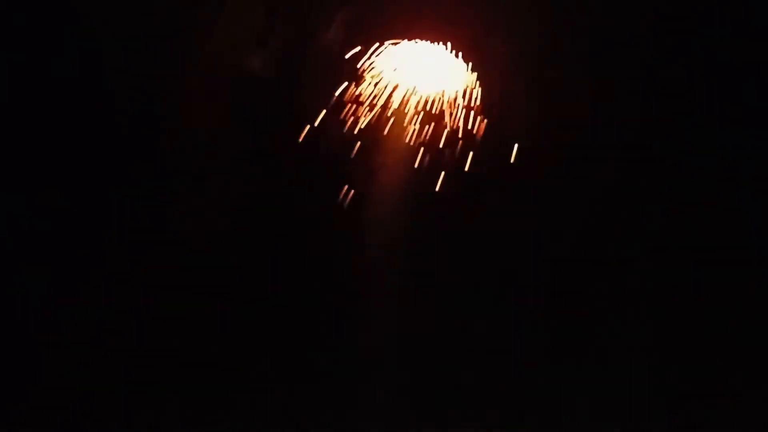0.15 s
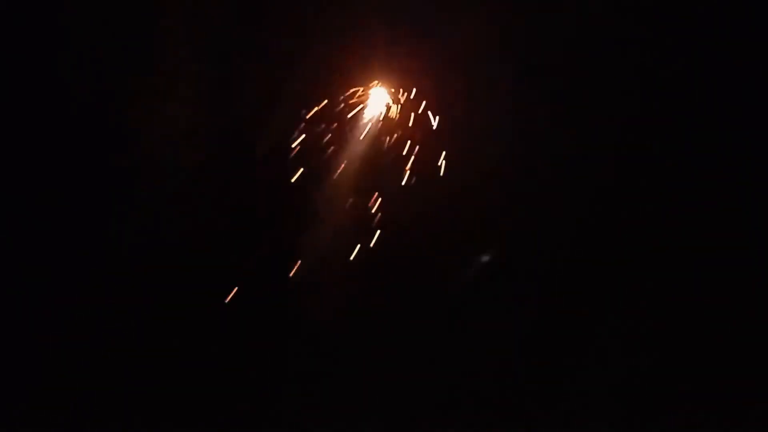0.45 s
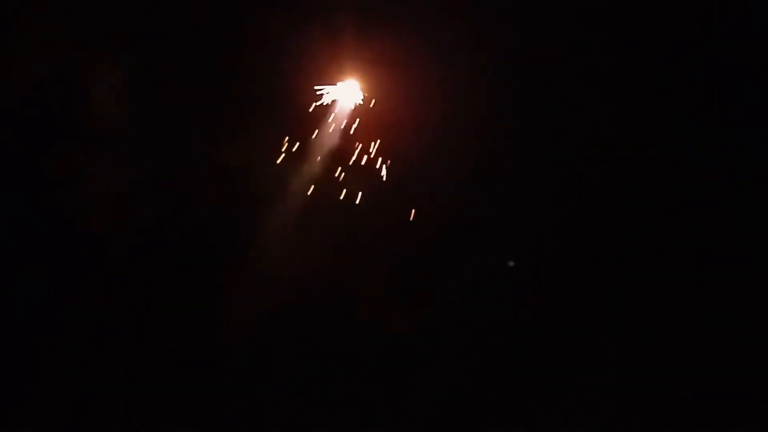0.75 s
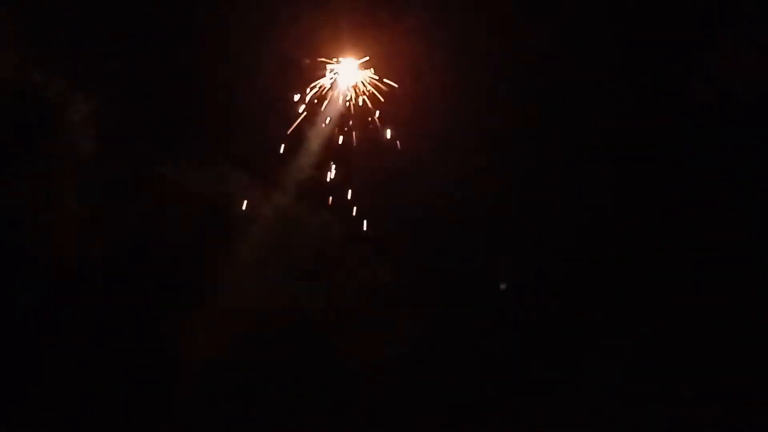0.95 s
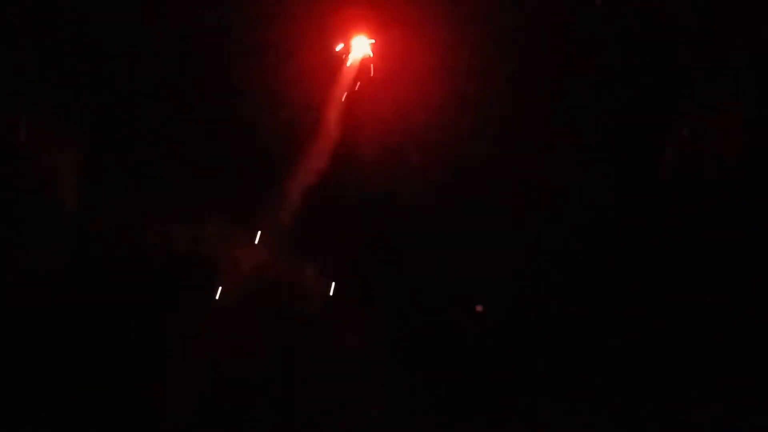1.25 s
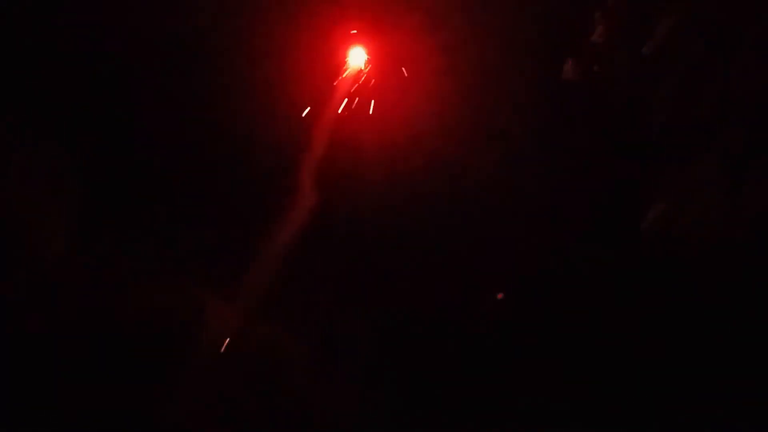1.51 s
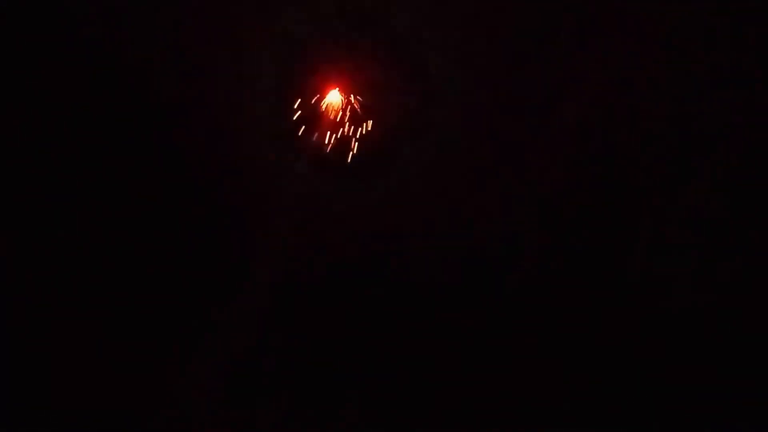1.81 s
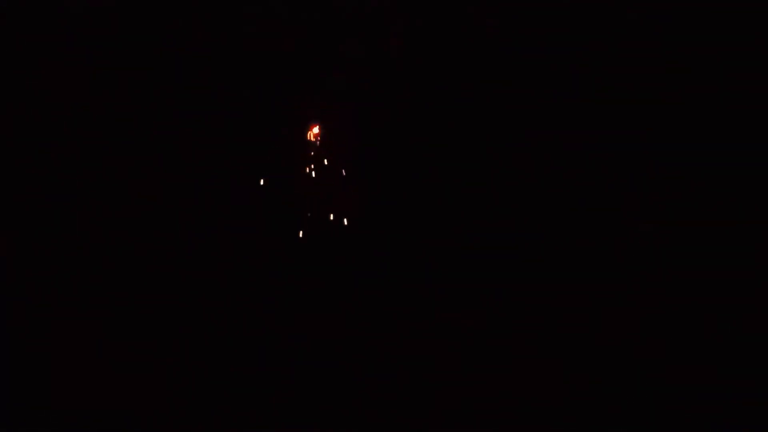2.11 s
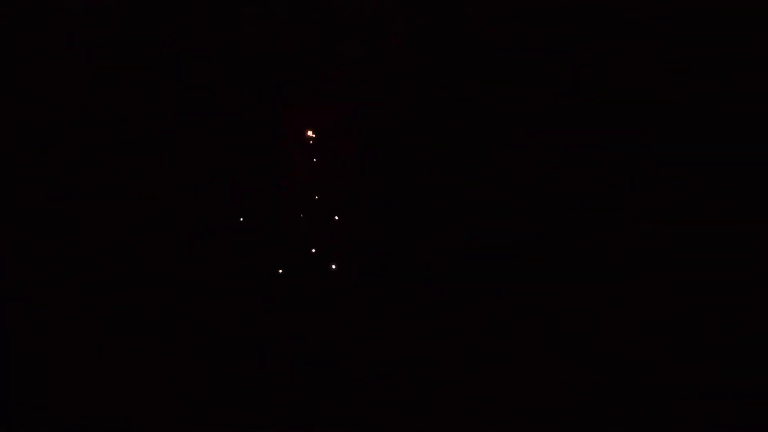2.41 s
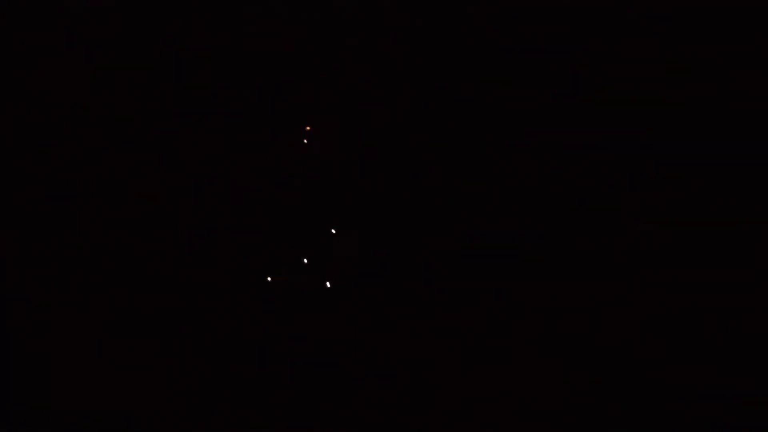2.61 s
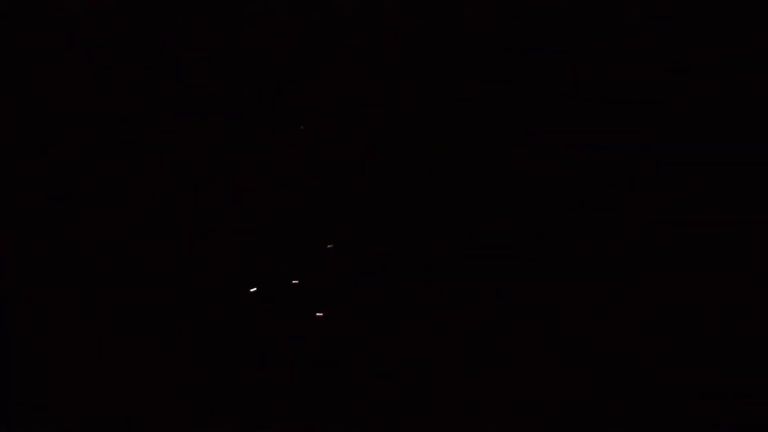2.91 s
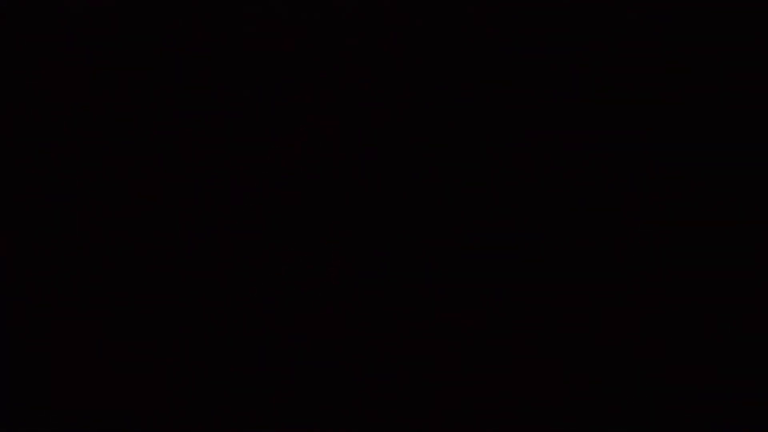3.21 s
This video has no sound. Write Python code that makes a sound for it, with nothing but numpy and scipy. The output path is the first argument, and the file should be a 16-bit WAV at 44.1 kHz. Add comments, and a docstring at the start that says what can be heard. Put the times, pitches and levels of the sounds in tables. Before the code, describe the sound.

Outdoors at a roadside, recorded from some distance, a firework's rushing hiss strengthens, flares rough and loud, breaks into quick pops and spurts, then leaves a few dry ticks and very faint insects.

```python
"""A spinner firework hisses up from a roadside at night, flares into a roar, then dies in spurts and pops.
Noise and random grains, shaped by spectra and level curves, make the jet; its rotation modulates them.
A ground echo that lags more and more sweeps a comb through the hiss; briefly the noise dips and pitches ring.
Towards the end, struck resonances and shaped grains give dry crackles, rustles and a soft knock.
Throughout lie quiet air and a faint chorus of insects, both made of filtered noise."""
import sys
import numpy as np
from scipy import signal
from scipy.fft import rfft, irfft, next_fast_len
from scipy.io import wavfile
from scipy.ndimage import map_coordinates

SR = 44100
rng = np.random.default_rng(int(sys.argv[2]) if len(sys.argv) > 2 else 0)


def wav_record(signal):
    """Record a signal, one row per channel, as 16-bit PCM in the file named by sys.argv[1]."""
    frames = np.transpose(np.atleast_2d(signal))
    bounded = np.clip(frames, -1, 1)
    # unit amplitude maps onto the largest positive 16-bit level
    quanta = np.round(bounded * 32767).astype(np.int16)
    wavfile.write(sys.argv[1], SR, quanta)


N = 147735
T = np.arange(N) / SR
CUTOFF_HZ = 15750  # upper edge of the audible band

# spectrum of burning powder going off, for pops and spurts: hz, relative_db
POP_SPECTRUM = [(30, -32), (80, -13.5), (250, -2), (400, 2.5), (780, 1), (1650, -7), (2600, -2), (4300, -9),
                (6300, -7.5), (7500, -16), (9500, -14.5), (12000, -29), (16000, -22)]


def from_db(db):
    """Convert decibels to an amplitude ratio by the logarithmic law."""
    return 10 ** (np.asarray(db) / 20)


def rms_one(x):
    """Normalise the mean power to one."""
    return x / np.sqrt(np.mean(x ** 2) + 1e-20)


def level(rows):
    """Amplitude envelope: interpolate a level curve linearly in decibels, then convert to gain."""
    return from_db(np.interp(T, *np.transpose(rows)))


def slow_noise(hz, rate, count, settle):
    """Two equal real poles smooth white noise into a slow random walk around zero, rms 1."""
    pole = np.exp(-2 * np.pi * hz / rate)
    walk = signal.lfilter([1], [1, -2 * pole, pole * pole], rng.standard_normal(count + settle))
    return rms_one(walk[settle:])


def drift(hz):
    """Random modulation at audio rate: low-passed noise with rms 1."""
    return slow_noise(hz, SR, N, settle=SR)


def colour(x, spectrum):
    """Minimum-phase filtering: folding the cepstrum yields the causal response of a given magnitude."""
    size = 2 * next_fast_len(N // 2 + SR // 8)
    hz, db = np.transpose(spectrum)
    grid = np.maximum(np.arange(size // 2 + 1) * SR / size, 1)
    magnitude = from_db(np.interp(np.log(grid), np.log(hz), db))
    cepstrum = irfft(np.log(magnitude))
    cepstrum[1:size // 2] *= 2
    cepstrum[size // 2 + 1:] = 0
    response = np.exp(rfft(cepstrum))
    return irfft(rfft(x, size) * response)[:N]


def low_pass(x, hz, order=1):
    """Treble attenuation by a Butterworth filter, maximally flat below its cutoff."""
    sos = signal.butter(order, min(hz, .45 * SR), fs=SR, output="sos")
    return signal.sosfilt(sos, x + 1e-18)  # the tiny offset keeps the filter out of denormal numbers


def resonate(x, hz, width_hz):
    """A damped resonator: a pole pair whose radius sets the bandwidth, with peak gain near 1."""
    r = np.exp(-np.pi * width_hz / SR)
    numerator = np.array([1, 0, -1]) * (1 - r * r) / 2
    denominator = [1, -2 * r * np.cos(2 * np.pi * hz / SR), r * r]
    return signal.lfilter(numerator, denominator, x + 1e-18)


def grains(per_s, spread_db):
    """Shot noise: independent random clicks of uneven size and either sign, rms 1."""
    sizes = from_db(spread_db * np.minimum(rng.exponential(1, N), 4))
    signs = rng.choice([-1, 1], N)
    struck = rng.random(N) < per_s / SR
    return rms_one(sizes * signs * struck)


def burst(start, hold, attack, release):
    """Exponential rise up to start, steady hold, exponential decay; attack and release are time constants."""
    before = np.minimum(T - start, 0)
    after = np.maximum(T - start - hold, 0)
    return np.exp(before / attack - after / release)


def patchy(x, depth_db, hz, band_count=30):
    """Subband modulation: overlapping narrow bands swell and sink independently."""
    control_hz = 1000
    bands = np.arange(N // 2 + 1) * SR / N / CUTOFF_HZ * band_count
    spectrum, out = rfft(x), np.zeros(N)
    for k in range(band_count + 1):
        slow = slow_noise(hz, control_hz, 3500, settle=1000)
        swell = np.interp(T * control_hz, np.arange(len(slow)), from_db(depth_db * slow))
        triangle = np.maximum(1 - np.abs(bands - k), 0)
        out += swell * irfft(spectrum * triangle, N)
    return out


def jet():
    """Amplitude modulation: the turning nozzle pulses hiss, roar and sizzle over rotor hum and bass flutter."""
    # rotation and its hum: time_s, turns_per_s (before jitter), hum_db (before waver)
    spin = [(0, 79, -92), (.29, 89, -84), (.35, 106, -76), (0.501, 92, -80), (0.801, 97, -66),
            (.88, 107, -58), (1.02, 117, -54), (1.14, 125, -62), (1.35, 112, -72.5), (1.9, 130, -80),
            (2.501, 85, -76), (2.7, 80, -110)]
    # level curves: time_s, level_db
    hiss_level = [(0, -39), (.15, -38.5), (.35, -32), (.62, -28), (1.0, -26.5), (1.09, -29), (1.15, -31),
                  (1.25, -28.5), (1.44, -30), (1.56, -28.5), (1.85, -29), (1.93, -40), (2.0, -45),
                  (2.3, -56), (2.36, -57), (2.5, -55), (2.7, -70.5), (2.85, -71), (3.0, -100)]
    roar_level = [(0, -69), (.35, -51), (.9, -44.5), (1.3, -36), (1.65, -37.5), (1.675, -26), (1.8, -26.5),
                  (1.87, -28), (1.94, -34), (2.0, -51), (2.07, -56), (2.48, -51.5), (2.6, -65.5),
                  (2.8, -107)]
    flutter_level = [(0, -78), (.29, -92), (.5, -65.5), (.66, -71), (.73, -60), (.8, -63), (1.0, -59.5),
                     (1.2, -62), (1.6, -80), (1.7, -55.5), (2.02, -71), (2.3, -67), (2.38, -47),
                     (2.5, -76.5), (2.8, -76.5), (3.0, -87)]
    sizzle_level = [(0, -35.5), (.3, -34.5), (.95, -28), (1.2, -34.5), (1.85, -35), (1.97, -38.5),
                    (2.1, -44.5), (2.3, -52), (2.37, -61), (2.5, -69), (2.75, -90)]
    # spectra of the gas spray, rough burn, bass flutter and fine sparks: hz, relative_db
    hiss_spectrum = [(60, -52), (200, -24.5), (500, -14.5), (1250, -10.5), (1700, -12.5), (2150, -4),
                     (2700, -2.5), (3250, -2.5), (4550, -2.5), (5400, -1.5), (6650, 0.5), (7100, -3.5),
                     (7900, -8.5), (8600, -7.5), (10000, -13), (11800, -19.5), (16000, -38)]
    roar_spectrum = [(40, -50), (110, -22.5), (200, -9), (420, -0.5), (800, -1), (1400, -4), (1750, -8),
                     (2600, -0.5), (3200, -2), (4300, -7.5), (6000, -7.5), (8000, -44), (12000, -47),
                     (16000, -6.5)]
    flutter_spectrum = [(25, -23), (55, -3), (80, -15), (115, 2.5), (170, 2.5), (300, -11.5), (1000, -63)]
    sizzle_spectrum = [(3000, -58), (7000, -9), (9200, -5.5), (10800, -14.5), (14000, -13), (14600, 1),
                       (15700, 0.5)]
    spin_depth, sizzle_spin_depth = 0.068, 0.37  # modulation as a share of the amplitude
    sparks_per_s, sparks_db, roar_grains_per_s = 3300, -3, 7000

    time_s, turns_per_s, hum_db = np.transpose(spin)
    speed = np.interp(T, time_s, turns_per_s) * (1 + .05 * drift(31))
    turn = np.sin(2 * np.pi * np.cumsum(speed) / SR)
    hum = rms_one(turn) * from_db(np.interp(T, time_s, hum_db) + 2 * drift(9.4))

    sparks = from_db(sparks_db) * grains(sparks_per_s, spread_db=1.0)
    spray = colour(rng.standard_normal(N) + sparks, hiss_spectrum)
    spray = patchy(spray, depth_db=1.5, hz=14.6)
    hiss = rms_one(spray) * level(hiss_level) * from_db(0.48 * drift(24))

    burn = colour(grains(roar_grains_per_s, spread_db=2.5), roar_spectrum)
    roar = rms_one(burn) * level(roar_level) * from_db(1.84 * drift(30))

    flutter = rms_one(colour(rng.standard_normal(N), flutter_spectrum)) * level(flutter_level)
    sizzle = rms_one(colour(rng.standard_normal(N), sizzle_spectrum)) * level(sizzle_level)
    pulsing = (1 + spin_depth * turn) * (hiss + roar)
    return pulsing + (1 + sizzle_spin_depth * turn) * sizzle + flutter + hum


def road_echo(x):
    """Comb interference: two dull ground reflections whose delay grows as the source climbs."""
    start_lag_s, limit_lag_s, climb_s = .00647, .01188, 1.72  # climb_s: time constant towards the limit
    lead_s = .0003  # the weak early reflection precedes the late one
    late_gain, early_gain = 0.52, 0.083
    lag = limit_lag_s + (start_lag_s - limit_lag_s) * np.exp(-T / climb_s)
    dull = low_pass(x, 3680)

    def delayed(delay):
        """Fractional delay by cubic interpolation, read one sample ahead of the lag."""
        return map_coordinates(dull, [(T - delay) * SR + 1], order=3, mode="mirror")

    return x + late_gain * delayed(lag) + early_gain * delayed(lag - lead_s)


def roadside(x):
    """Diffuse scattering: things along the road return a short tail of dull, decaying noise."""
    tail_db, t60_s = -16.5, 0.25
    t = T[:SR // 2]
    tail = low_pass(rng.standard_normal(len(t)), 5160) * from_db(-60 * t / t60_s)
    return x + from_db(tail_db) * signal.fftconvolve(x, tail / np.linalg.norm(tail))[:N]


def night():
    """Band-limited noise: quiet air, and insects as narrow bands with a throbbing level."""
    # spectrum of the quiet air: hz, relative_db
    air_spectrum = [(25, -23), (50, -1), (100, 3.5), (160, -3), (330, -7.5), (850, -16.5), (2200, -12),
                    (3400, -15), (3900, -21), (4700, -24), (5200, -15.5), (7500, -8), (9600, -9.5),
                    (10400, -37), (16000, -44)]
    # insect bands: centre_hz, width_hz, level_db (before the throb)
    insect_bands = [(1522, 186, -70), (2380, 220, -85.5), (3050, 423, -77), (5250, 420, -69.5),
                    (6000, 990, -68), (8910, 440, -73.5)]
    air_db, throb_db, throb_hz = -70, 0.5, 24.9
    out = from_db(air_db) * rms_one(colour(rng.standard_normal(N), air_spectrum))
    for hz, width, db in insect_bands:
        edges = [hz - width / 2, hz + width / 2]
        sos = signal.butter(5, edges, "band", fs=SR, output="sos")
        band = signal.sosfilt(sos, rng.standard_normal(N))
        out = out + rms_one(band) * from_db(db + throb_db * drift(throb_hz))
    return out


def stutter(x):
    """Resonant ringing: the sound dips for an instant while narrow resonators it excites ring out."""
    # moments of the dip: centre_s, lower_bound_of_pitches_hz, ring_relative_to_sound_db
    dips = [(0.252, 2287, -3), (.806, 2280, -2.5), (0.934, 2610, -4), (1.317, 2284, -0.5),
            (1.361, 2389, -1), (1.403, 3400, -2), (2.023, 4010, -14), (2.277, 306, -4.5), (2.47, 1780, -4)]
    dip_db, dip_width_s, ring_width_s = -14.5, 0.0082, .014  # widths of Gaussian curves
    spacing_hz, line_width_hz = 622.2, 41
    out, half = x.copy(), SR // 8
    for s, lower_hz, db in dips:
        span = slice(int(s * SR) - half, int(s * SR) + half)
        near, t = x[span], T[span] - s
        pitches = lower_hz + spacing_hz * (np.arange(32) + .5 * rng.random(32))
        ring = np.zeros(len(near))
        for hz in pitches[pitches < CUTOFF_HZ]:
            ring += resonate(resonate(near, hz, line_width_hz), hz, line_width_hz)
        ring = low_pass(ring, 6600, order=2)
        swell = np.exp(-(t / ring_width_s) ** 2)
        ring *= from_db(db) * np.linalg.norm(near * swell) / np.linalg.norm(ring * swell)
        dip = from_db(dip_db * np.exp(-(t / dip_width_s) ** 2))
        out[span] += swell * ring + near * (dip - 1)
    return out


def pops():
    """Impulse response: each larger lump of powder goes off as one pressure pulse, dulled by a low-pass."""
    # single pops: start_s, peak_db, low_pass_hz
    lumps_of_powder = [(0.5881, -24.5, 750), (.596, -41, 700), (0.603, -36, 550), (1.668, -21.5, 900),
                       (1.802, -28, 1500), (1.819, -12, 6960), (1.916, -24, 3500), (1.954, -21, 8000),
                       (2.0119, -22, 7000), (2.09, -22.5, 4500), (2.112, -21, 4000), (2.1609, -24.5, 4000),
                       (2.2151, -24, 3000), (2.218, -36, 4000), (2.2533, -33, 5000), (2.324, -30, 3000),
                       (2.3435, -30, 2000), (2.3524, -37, 2500), (2.3642, -30, 2200), (2.451, -27.5, 6000),
                       (2.755, -51.5, 1190), (2.827, -57, 500), (3.067, -57, 2000)]
    pulse = colour(signal.unit_impulse(N), POP_SPECTRUM)[:SR // 20]
    out = np.zeros(N)
    for s, db, hz in lumps_of_powder:
        pop, at = low_pass(pulse, hz, order=2), int(s * SR)
        out[at:at + len(pop)] += from_db(db) * pop / np.abs(pop).max()
    return out


def tones():
    """Frequency modulation: short sine tones waver in pitch and flicker in level above the noise."""
    # brief tones: start_s, hold_s, level_db, pitch_hz (before the waver)
    brief_tones = [(1.337, 0.081, -42.5, 526), (1.386, 0.034, -43.5, 432), (2.014, 0.019, -45, 782),
                   (2.011, 0.027, -49, 1087), (2.012, 0.022, -52.5, 1830), (2.76, 0.14, -72, 631),
                   (2.87, 0.019, -60.5, 3530), (2.877, 0.019, -64, 3160)]
    fade_s = 0.0075  # time constant
    waver = 1 + 0.009 * drift(12.9)
    flicker = from_db(2 * drift(38))
    out = np.zeros(N)
    for s, hold, db, hz in brief_tones:
        tone = rms_one(flicker * np.sin(2 * np.pi * np.cumsum(hz * waver) / SR))
        out += from_db(db) * burst(s, hold, fade_s, fade_s) * tone
    return out


def sputter():
    """Gated shot noise: the last powder burns in lumpy spurts of tiny pops."""
    # dying spurts: start_s, hold_s, level_db
    spurts = [(2.085, 0.038, -40.5), (2.148, 0.024, -40.5), (2.241, 0.022, -41), (2.328, 0.026, -37.5),
              (2.36, 0.047, -41), (2.443, 0.045, -56)]
    attack_s, release_s, grains_per_s = 0.0053, 0.024, 5500
    flow = sum(from_db(db) * burst(s, hold, attack_s, release_s) for s, hold, db in spurts)
    lumps = from_db(3 * np.minimum(drift(302), 2))
    return flow * rms_one(colour(lumps * grains(grains_per_s, spread_db=1.5), POP_SPECTRUM))


def rustles():
    """Resonant shot noise: short soft patches of fine grains, each around one broad resonance."""
    # patches: start_s, hold_s, level_db, pitch_hz
    patches = [(2.796, 0.036, -63.5, 3000), (2.852, 0.011, -54, 3270), (2.955, 0.032, -65.5, 2780),
               (2.465, 0.021, -49, 420), (2.622, .025, -63.5, 212), (2.758, 0.11, -68.5, 120)]
    attack_s, release_s, q, grains_per_s = 0.0057, 0.01, 3.2, 4400
    out = np.zeros(N)
    for s, hold, db, hz in patches:
        rustle = resonate(grains(grains_per_s, spread_db=1), hz, hz / q)
        rustle = rms_one(low_pass(rustle, 5500, order=3))
        out += from_db(db) * burst(s, hold, attack_s, release_s) * rustle
    return out


def crackles():
    """Impulsive excitation: a click with a little grit rings a damped resonance at its own pitch."""
    # dry snaps: start_s, peak_db, pitch_hz, q (sharpness of the ring), low_pass_hz
    snaps = [(2.518, -30, 3580, 1.6, 5170), (2.571, -41, 2180, 3.3, 4200), (2.815, -37.5, 2660, 3.7, 10000),
             (2.832, -39, 2920, 4, 9000), (2.8421, -35.5, 2700, 4.9, 9000), (2.85, -36, 3040, 3, 10900),
             (2.895, -51, 3500, 2, 6000), (2.909, -36.5, 1410, 2.8, 6000), (2.937, -43.5, 2650, 8, 3600),
             (2.962, -48.5, 2840, 5.6, 4200), (3.194, -50, 2400, 2, 4500)]
    decay_s, grit_db, bright_db = 0.0018, -17, -9
    out, t = np.zeros(N), T[:SR // 20]
    for s, db, hz, q, top_hz in snaps:
        grit = from_db(grit_db) * rng.standard_normal(len(t)) * np.exp(-t / decay_s)
        click = signal.unit_impulse(len(t)) + grit
        bright = from_db(bright_db) * resonate(click, 4200, 2300)  # broad snap shared by all
        snap = low_pass(resonate(click, hz, hz / q) + bright, top_hz, order=4)
        at = int(s * SR)
        out[at:at + len(t)] += from_db(db) * snap / np.abs(snap).max()
    return out


def knock():
    """Modal synthesis: one soft contact and a dying scuff ring the modes of a small hollow body."""
    # modes of the body: pitch_hz, width_hz, relative_db
    modes = [(1050, 100, -14), (1240, 81, 12), (1390, 160, -6), (1900, 200, -4), (2480, 230, -17)]
    start_s, peak_db, decay_s, scuff_db = 3.198, -49, 0.018, -15
    scuff = rng.standard_normal(N) * (T >= start_s) * np.exp(-np.abs(T - start_s) / decay_s)
    push = signal.unit_impulse(N, int(start_s * SR)) + from_db(scuff_db) * scuff
    body = sum(from_db(db) * resonate(push, hz, width) for hz, width, db in modes)
    body = low_pass(body, 3200, order=3)
    return from_db(peak_db) * body / np.abs(body).max()


def scene():
    """Superposition: the firework with its reflections adds to the quiet sounds of the night."""
    airborne = road_echo(jet() + sputter() + pops())
    firework = stutter(roadside(airborne + crackles()))
    return (firework + rustles() + knock() + tones() + night())[None]


def record(dry):
    """Band limiting: an elliptic low-pass cuts the topmost treble steeply."""
    sos = signal.ellip(12, .2, 80, CUTOFF_HZ, fs=SR, output="sos")
    return signal.sosfilt(sos, dry)


dry = scene()
out = record(dry)
wav_record(out)
```